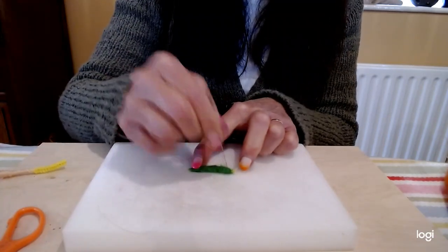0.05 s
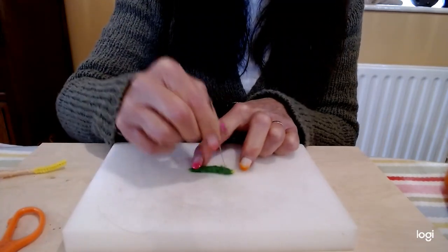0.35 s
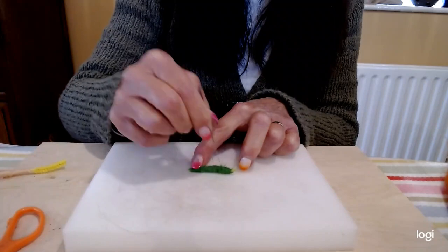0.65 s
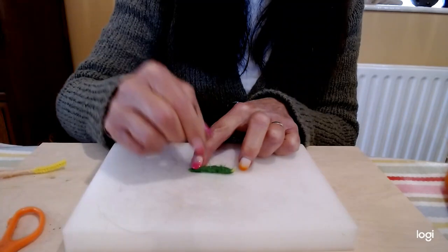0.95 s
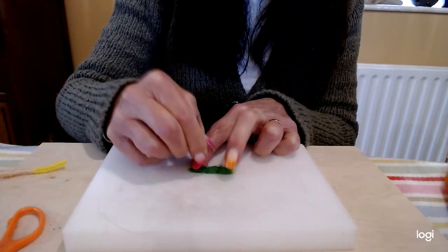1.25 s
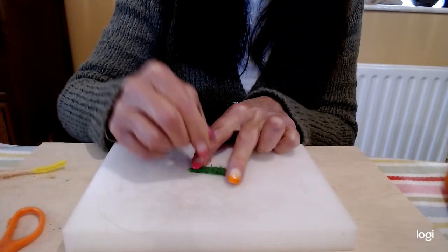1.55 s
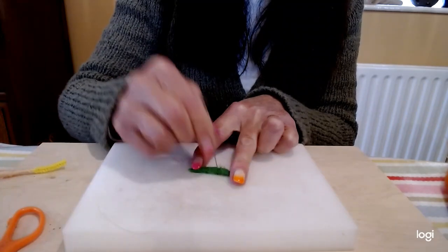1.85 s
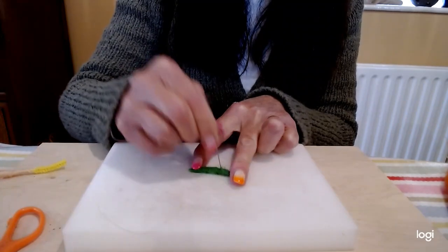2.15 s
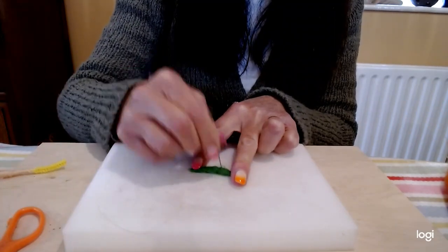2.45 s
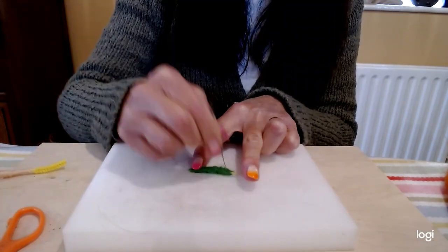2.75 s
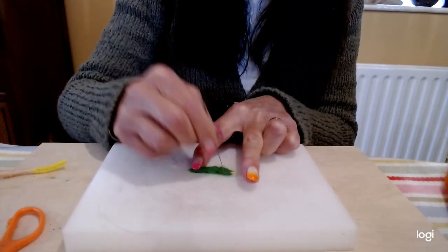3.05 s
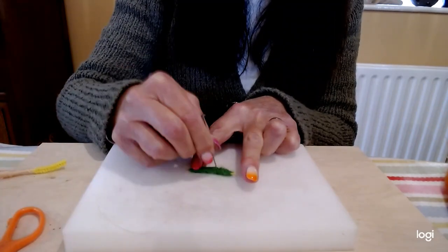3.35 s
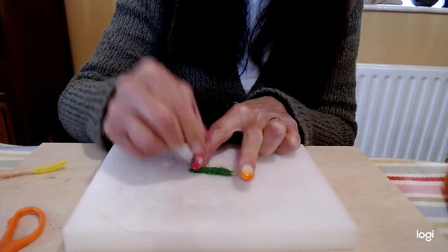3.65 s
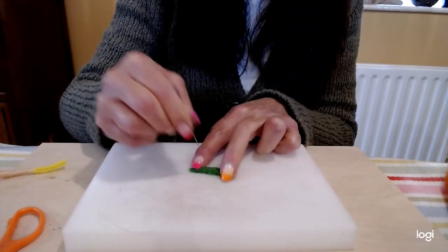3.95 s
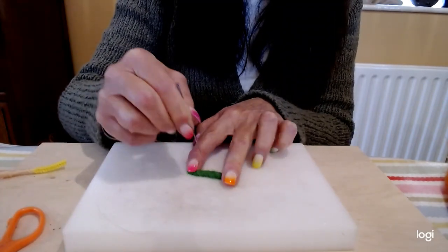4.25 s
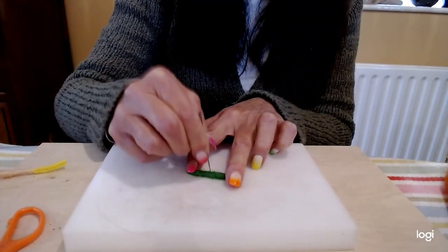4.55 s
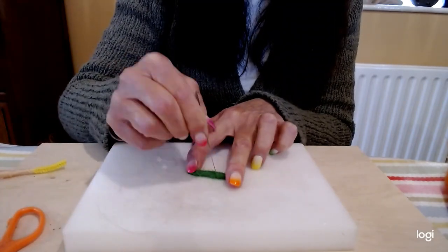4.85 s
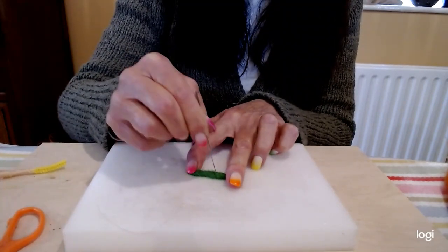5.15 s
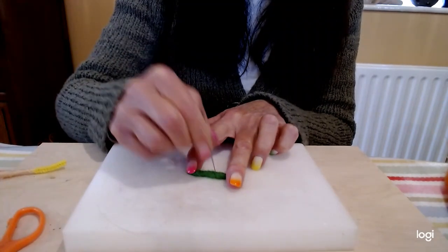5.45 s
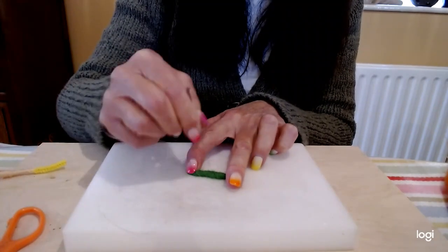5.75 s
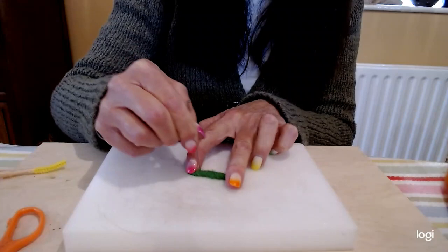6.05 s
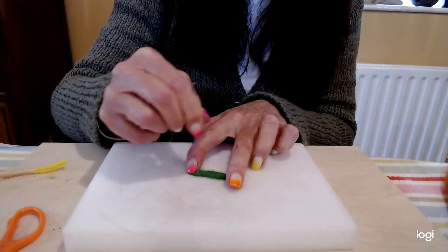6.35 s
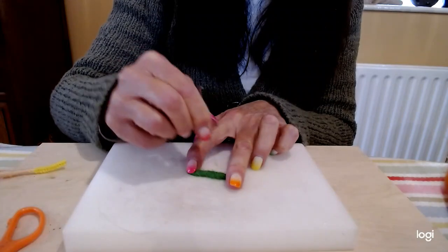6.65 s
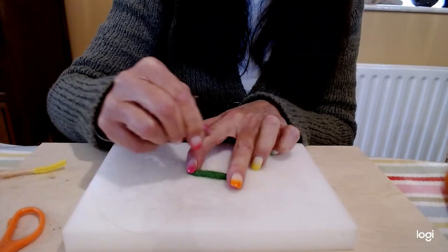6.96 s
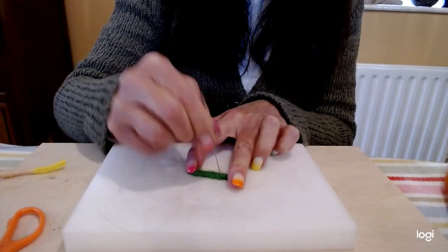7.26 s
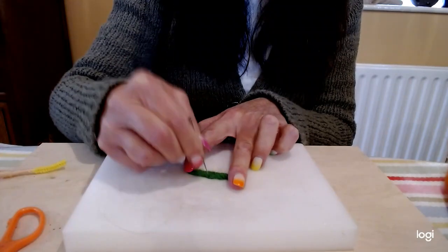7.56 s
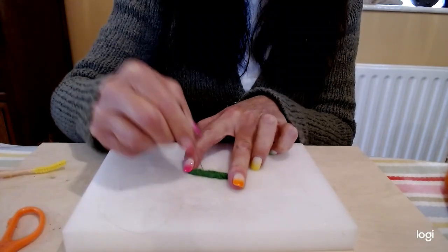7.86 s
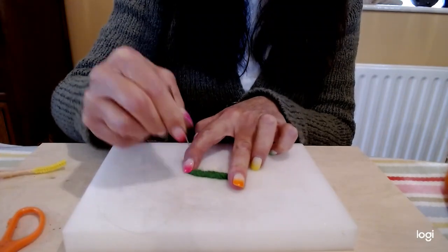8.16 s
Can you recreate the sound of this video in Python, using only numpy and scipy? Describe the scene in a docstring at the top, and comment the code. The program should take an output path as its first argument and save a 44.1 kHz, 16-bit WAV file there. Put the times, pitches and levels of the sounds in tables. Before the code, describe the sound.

Quick, crunchy pokes of a needle into wool on a foam board, turning sparse and soft midway, then picking up again.

```python
"""A barbed felting needle stabs through wool into a foam board on a table; small quiet room, close mic pair.
From 0 s, about five stabs a second: foam cells crunch and snap, the board rings hollow, the table shakes,
the needle scrapes out. Near 2.6 s the stabs pause and fingers rub the wool; at 3.2 s they resume.
After 4.2 s they turn sparse and softer. From 5.6 s the hands bump the table and its sway swells;
the stabs pick up again and regain their level by the end, at 8.2 s."""
import sys
import numpy as np
from scipy import signal
from scipy.fft import rfft, irfft, next_fast_len
from scipy.io import wavfile

SR = 44100
rng = np.random.default_rng(int(sys.argv[2]) if len(sys.argv) > 2 else 0)


def put_to_file(sound):
    """Save the sound as 16-bit audio at rate SR, in the file named by the first command-line argument."""
    columns = np.atleast_2d(sound).T  # one column per channel
    safe = np.clip(columns, -1, 1)
    whole_steps = np.round(safe * 32767)
    wavfile.write(sys.argv[1], SR, whole_steps.astype(np.int16))


N = 361619
TAPS = 2048

# Event levels are before each source's gain; knock and crisp are relative to the ring.
# needle strokes: start/s, end/s, level/dB, knock/dB, crisp/dB, pull-out/dB, table push/dB
STABS = [(0, 0.04, -35, -4.5, -10, -52.5, -58), (0.196, 0.238, -41.5, -6, -10, -61, -58),
         (0.408, .451, -35.5, -4.5, -9.5, -52, -53.5), (0.615, 0.659, -35.5, -5, -9.5, -54.5, -59),
         (0.844, 0.887, -40.5, -2.5, -11, -57.5, -61), (1.058, 1.098, -34.5, -9, -12, -53, -54.5),
         (1.259, 1.306, -31, -4.5, -15, -37, -37.5), (1.476, 1.517, -34.5, -5, -7, -48, -55),
         (1.689, 1.73, -29.5, -5, -12.5, -46, -58), (1.91, 1.94, -37, .5, -17, -53.5, -56.5),
         (2.113, 2.154, -32.5, 1, -17, -59, -54), (2.324, 2.368, -37, -3, -13, -50.5, -63.5),
         (2.53, 2.566, -32.5, 0, -12, -52, -51), (3.235, 3.279, -42.5, -5.5, -7.5, -62.5, -69.5),
         (3.46, 3.496, -35, -8.5, -11, -49.5, -52), (3.675, 3.707, -32, -8, -9.5, -54, -53),
         (3.881, 3.926, -34, -10, -9, -48, -51.5), (4.09, 4.141, -33.5, -5, -13, -51.5, -53),
         (4.629, 4.664, -66.5, -13, 2.5, -86.5, -81), (5.064, 5.128, -45, -13.5, 1, -59.5, -68),
         (5.443, 5.482, -40.5, -7, -14, -54, -59.5), (5.881, 5.909, -40, -7.5, -10, -52, -56),
         (6.062, 6.094, -60.5, -4, -11, -72.5, -56), (6.316, 6.348, -47.5, -8.5, -9, -57.5, -64),
         (6.5, 6.546, -48, -7, -9, -58.5, -61.5), (6.7, 6.747, -52, -6, -7.5, -52.5, -66),
         (6.93, 6.974, -42.5, -9, -12.5, -54, -55.5), (7.138, 7.194, -38, -3.5, -10, -55.5, -55.5),
         (7.572, 7.62, -35, 3, -7, -47, -50), (7.782, 7.829, -37, -5.5, -14, -49, -60),
         (8.002, 8.037, -34, -10, -11, -48, -59.5)]
# board ring as the needle moves along the wool: t/s, f/Hz
RING_TRACK = [(0, 1486), (.43, 1305), (.7, 1446), (1.26, 1293), (1.5, 1334), (1.72, 1305), (2.15, 1445),
              (2.55, 1364), (3.25, 1267), (3.48, 1196), (4.15, 1207), (4.7, 1420), (5.08, 1410),
              (5.45, 1195), (6.95, 1185), (7.7, 1056), (8.1, 1212)]
# modes near the needle, for a ring at RING_REF_HZ: f/Hz, half-width/Hz, level/dB
RING_MODES = [(969, 87, -10), (1098, 100, -3.5), (1280, 140, 0.5), (1489, 26, -7), (1684, 150, -9.5),
              (2249, 230, -17.5)]
RING_REF_HZ = 1303
# board's hollow knock: f/Hz, half-width/Hz, level/dB
KNOCK_MODES = [(180, 25, -26), (414.5, 17, -8.5), (546, 55, -4.5), (651, 71.3, 4.5), (723, 30, -6)]
# deepest board modes, stronger where the ring is high: f/Hz, half-width/Hz, level/dB
DEEP_MODES = [(170.1, 28, -24), (291, 50, -15)]
# spectrum of a bursting cell's edge: f/Hz, level/dB
CRISP_SPECTRUM = [(900, -38), (1900, 0), (2400, 1), (3000, -2.5), (3650, -4), (4600, -11), (5600, -11),
                  (7000, -13), (8200, -24), (9200, -22), (12200, -27.5), (13200, -25.5), (16000, -29.5)]
# table shaken by a stab: f/Hz, density/dB
SHAKE_SPECTRUM = [(10, -14), (25, 1.5), (45, -3), (70, -14), (110, -17), (160, -20), (250, -37.5),
                  (500, -65)]
# table's deeper sway: f/Hz, density/dB
SWAY_SPECTRUM = [(8, 0), (14, 2.5), (30, -10), (60, -17), (110, -27), (200, -44), (500, -73)]
# sway under leaning hands: t/s, level/dB
SWAY_TRACK = [(0, -62), (2.4, -72), (3.1, -78), (5.25, -90.5), (5.6, -55), (5.9, -47), (6.3, -44.5),
              (6.8, -59.5), (7.5, -58.5), (8.2, -72.5)]
# still air: f/Hz, density/dB
AIR_SPECTRUM = [(20, -6.5), (60, -11.5), (120, -15), (220, -18), (400, -21.5), (800, -29), (1600, -31),
                (3000, -37), (6000, -41), (9000, -50), (16000, -49.5)]
# room hum: f/Hz, level/dB
HUM_TONES = [(147, -83.5), (292, -87)]
# hard catches of the needle: t/s, level/dB, knock/dB, crisp/dB
SNAPS = [(.0063, -28, -4, -14), (0.2061, -37, -5.5, -31), (0.4191, -37.5, -7, -16.5),
         (0.4337, -32, -6, -14), (.857, -41.5, 4, -32), (1.0698, -34.5, -21, -36),
         (1.0895, -29.5, -8.5, -5.5), (1.2568, -11, -4.5, -17.5), (1.4978, -29, -16.5, -4),
         (1.7244, -26, -3.5, -32), (1.9142, -34.5, 3.5, -31.5), (1.943, -42.5, -4, -8.5),
         (2.135, -32.5, -8, -10), (2.1587, -34, -3, -7), (2.3419, -29, -6, -13.5), (2.544, -23, -4, -10),
         (3.4803, -27, -7, -14), (3.674, -33, 0, -13), (3.688, -30, -3, -10), (3.8732, -41.5, -23, -9),
         (3.896, -24, -12.5, -30), (3.9094, -32, -17, -9), (4.1335, -34, -11, -5), (4.6577, -58, -13.5, -1),
         (5.0419, -37, -25, 3.5), (5.0519, -35.5, -9, 11), (5.0607, -33.5, -29, 1),
         (5.0729, -34, -22, 25.5), (5.2468, -50, -30, -19), (5.4583, -34.5, -14, -16),
         (5.6452, -40.5, -9, -21.5), (5.8908, -27, -7, -14.5), (5.9035, -37.5, -13, -7),
         (6.0685, -43.5, 3, -16), (6.316, -50.5, -6, -16), (6.5113, -38, -8, -10.5),
         (6.531, -34.3, -8.5, -3.5), (6.609, -53, -23, -0.5), (6.7274, -36, -6.5, -21),
         (7.1336, -29.5, 5, -34), (7.1769, -32.5, -9.5, -5.5), (7.419, -49.5, 11, -29),
         (7.5602, -26, 3.5, -17), (7.574, -23.5, 2, -16.5), (7.82, -35.5, -1, -13),
         (7.8796, -43.5, -4, -15), (8.0164, -33.5, -9, -16.5), (8.0306, -27, -11, -13),
         (8.125, -46.5, -8.5, -10.5)]
# fingers sliding on wool and foam: start/s, end/s, level/dB, crisp/dB
RUBS = [(.784, .843, -55.5, -12.5), (1.645, 1.673, -58, 0), (2.63, 2.709, -62, -6),
        (2.776, 2.85, -58.5, -14), (2.84, 2.961, -60, -2.5), (2.951, 3.131, -71, -6.5),
        (4.517, 4.545, -70.5, -6.5), (5.21, 5.26, -56.5, -6), (5.712, 5.737, -62, -12),
        (7.329, 7.361, -59.5, -16)]
# hand bumps on the table: t/s, level/dB
BUMPS = [(5.642, -40.5), (6.07, -42), (7.338, -45)]
# mic ports, left minus right: f/Hz, level/dB
PORT_BALANCE = [(60, 0.0), (110, 0.5), (200, -4), (380, 2.6), (700, 0.5), (1290, -0.5), (2380, -1.5),
                (4400, -1.5), (8120, 0), (15000, -1)]
# mic ports, left lead: f/Hz, phase/rad
PORT_PHASE = [(100, -2), (600, 0.5), (860, 0), (1450, 0.28), (2070, 0.64), (2760, 1), (3620, 0.38),
              (6500, 0.77), (11000, 0.5), (16000, -1.5)]
# early reflections off table and walls: delay/s, gain
ECHOES = [(.0048, 0.17), (.0105, 0.055), (.0135, .06), (.0245, 0.053), (0.0306, .07), (.0412, 0.041)]
# room decay: f/Hz, T60/s
ROOM_T60 = [(200, 0.52), (650, 0.19), (1500, 0.27), (4000, 0.26), (8000, 0.22), (15000, 0.19)]
# recorder filters' lag, greatest near their crossover: f/Hz, delay/s
GROUP_DELAY = [(0, 0.00084), (4000, 0.00054), (6000, 0.0013), (6800, 0), (7400, .0042), (7900, 0.00022),
               (8600, 0.0022), (10000, 0.00047), (16000, 0.0014)]


def amp(db):
    """dB to gain."""
    return 10 ** (np.asarray(db) / 20)


def unit(x):
    """Scale to rms 1."""
    return x / np.sqrt(np.mean(abs(x) ** 2) + 1e-30)


def lookup(points, hz):
    """Interpolate on a log-frequency axis."""
    f, value = np.transpose(points)
    return np.interp(np.log(hz + 1), np.log(f + 1), value)


def add(mix, start_s, sound):
    """Mix in at start_s."""
    part = mix[max(round(start_s * SR), 0):][:len(sound)]
    part += sound[:len(part)]


def noise(spectrum):
    """Shaped noise, rms 1."""
    gain = amp(lookup(spectrum, np.fft.rfftfreq(N, 1 / SR)))
    return unit(irfft(rfft(rng.standard_normal(N)) * gain, N))


def min_phase(gain):
    """Impulse response, energy 1: sudden onset, then ringing."""
    cepstrum = irfft(np.log(unit(gain) + 1e-5))
    cepstrum[1:TAPS // 2] *= 2
    cepstrum[TAPS // 2 + 1:] = 0
    response = irfft(np.exp(rfft(cepstrum)))
    return response / np.linalg.norm(response)


def modes(rows, uneven_db):
    """Gain of a set of resonances; each spot on the board drives them differently."""
    hz = np.fft.rfftfreq(TAPS, 1 / SR)
    peaks = [amp(db + uneven_db * rng.uniform(-1.31, 1)) / (1 + ((hz - f) / width) ** 2)
             for f, width, db in rows]
    return unit(np.linalg.norm(peaks, axis=0))


def board(at_s, knock_db, deep_db_per_octave=40):
    """Board's response to a bursting cell at the spot worked at at_s: hollow knock plus ring."""
    shift = np.interp(at_s, *np.transpose(RING_TRACK)) / RING_REF_HZ
    deep = [(f, width, db + deep_db_per_octave * np.log2(shift)) for f, width, db in DEEP_MODES]
    retune = rng.uniform(.95, 1.05)  # finger pressure varies per blow
    knock = modes([(f * retune, width, db) for f, width, db in KNOCK_MODES + deep], uneven_db=3)
    ring = modes([(f * shift, width, db) for f, width, db in RING_MODES], uneven_db=2.5)
    return min_phase(np.hypot(amp(knock_db) * knock, ring))


def cell_tear(decay_s=.00073):
    """Crisp edge of a bursting cell: a tiny ragged rip, energy 1."""
    t = np.arange(TAPS) / SR
    rip = rng.standard_normal(TAPS) * t * np.exp(-t / decay_s)
    gain = amp(lookup(CRISP_SPECTRUM, np.fft.rfftfreq(TAPS, 1 / SR)))
    edge = signal.fftconvolve(rip, min_phase(gain))[:TAPS]
    return edge / np.linalg.norm(edge)


def crunch(start_s, end_s, knock_db, crisp_db, *,
           slip_hz, fizz, rise_s, fall_s, arch_db, brighten_db, slip_exponent):
    """Stick-slip over a fizz of fibres. Returns onset/s and sound, rms 1 over the stroke."""
    t = np.arange(max(start_s - .04, 0), end_s + .05, 1 / SR)
    stroke_rng = np.random.default_rng(rng.integers(2 ** 32))
    stick = stroke_rng.gamma(5, 1 / 5, 200)
    slip_at = np.round(np.cumsum(stick) * SR / slip_hz).astype(int)
    inside = slip_at < len(t)
    slips = np.zeros(len(t))
    slips[slip_at[inside]] = stick[inside] ** slip_exponent  # longer stick, harder release
    patch = stroke_rng.integers(0, 5, 100)[((t - t[0]) / .008).astype(int)]  # new cells every 8 ms
    fibres = stroke_rng.laplace(size=len(t))
    depth = np.minimum((t - start_s) / (end_s - start_s), 1)
    friction = amp(-arch_db * (2 * np.maximum(depth, 0) - 1) ** 2)  # peaks mid-stroke
    friction *= np.exp(np.minimum(t - start_s, 0) / rise_s - np.maximum(t - end_s, 0) / fall_s)
    drive = (unit(slips) + fizz * unit(fibres)) * friction
    body = signal.fftconvolve(drive, board(start_s, knock_db))
    edge_drive = drive * amp(brighten_db * depth)  # soft wool on top, crisp foam below
    edge = sum(signal.fftconvolve(edge_drive * (patch == k), cell_tear()) for k in range(5))
    sound = unit(body) + amp(crisp_db) * unit(edge)
    return t[0], sound * np.sqrt((end_s - start_s) * SR) / np.linalg.norm(sound)


def stabs(gain_db=-.78):
    """Barbs tear down through wool and foam."""
    out = np.zeros(N)
    for start_s, end_s, db, knock_db, crisp_db, _, _ in STABS:
        onset_s, sound = crunch(start_s, end_s, knock_db, crisp_db, slip_hz=200, slip_exponent=.67,
                                fizz=.61, rise_s=.0055, fall_s=.0012, arch_db=8, brighten_db=4.5)
        add(out, onset_s, amp(db + gain_db) * sound)
    return out


def rumble(spectrum):
    """Low noise, rms 1, nearly alike at both ports."""
    shared = noise(spectrum)
    return unit(np.array([shared + .3 * noise(spectrum) for _ in range(2)]))


def table_shake(gain_db=-5, rise_s=.02, release_at_s=.09, fall_s=.016):
    """Each stab pushes the table: build, hold, release."""
    t = np.arange(SR // 2) / SR
    envelope = np.minimum(t / rise_s, 1) * np.exp(-np.maximum(t - release_at_s, 0) / fall_s)
    push = np.zeros(N)
    for start_s, *_, push_db in STABS:
        add(push, start_s, amp(push_db + gain_db) * envelope)
    return push * rumble(SHAKE_SPECTRUM)


def table_sway(gain_db=-4):
    """The table sways under leaning hands."""
    level_db = np.interp(np.arange(N) / SR, *np.transpose(SWAY_TRACK))
    return amp(level_db + gain_db) * rumble(SWAY_SPECTRUM)


def room_tone(air_db=-77.5):
    """Still air and a faint hum."""
    t = np.arange(N) / SR
    hum = sum(amp(db) * np.sqrt(2) * np.sin(2 * np.pi * (hz * t + rng.random())) for hz, db in HUM_TONES)
    shared = noise(AIR_SPECTRUM)
    air = unit(np.array([shared + noise(AIR_SPECTRUM) for _ in range(2)]))
    return amp(air_db) * air + hum


def snaps(gain_db=22, ragged=.69, ragged_s=.0011):
    """The needle catches and breaks through: one blow on the board, with brief ragged tearing."""
    out = np.zeros(N)
    t = np.arange(TAPS // 8) / SR
    for at_s, db, knock_db, crisp_db in SNAPS:
        drive = rng.standard_normal(len(t)) * np.exp(-t / ragged_s)
        drive *= ragged / np.linalg.norm(drive)
        drive[0] = 1  # the blow
        body = signal.fftconvolve(drive, board(at_s, knock_db))[:TAPS]
        snap = body / np.linalg.norm(body) + amp(crisp_db) * cell_tear(decay_s=.00061)
        add(out, at_s, -amp(db + gain_db) * snap / np.linalg.norm(snap))
    return out


def scrapes(strokes, gain_db=-3.5, knock_db=-7):
    """Needle or finger slides on wool and foam: softer and finer grained than a stab."""
    out = np.zeros(N)
    for start_s, end_s, db, crisp_db in strokes:
        onset_s, sound = crunch(start_s, end_s, knock_db, crisp_db, slip_hz=480, slip_exponent=1,
                                fizz=1, rise_s=.011, fall_s=.008, arch_db=7, brighten_db=2)
        add(out, onset_s, amp(db + gain_db) * sound)
    return out


def pull_outs(rest_s=.031, pull_s=.041, ref_db=-55, ref_crisp_db=-13, dulling_db_per_db=.39):
    """The needle rests, then scrapes out; a harder pull adds more ring than hiss."""
    strokes = []
    for _, end_s, *_, pull_db, _ in STABS:
        crisp_db = ref_crisp_db - dulling_db_per_db * (pull_db - ref_db)
        strokes.append((end_s + rest_s, end_s + rest_s + pull_s, pull_db, crisp_db))
    return scrapes(strokes)


def table_bumps(mode_hz=32.2, decay_s=.036):
    """A hand bumps the table: one damped low mode."""
    t = np.arange(SR // 2) / SR
    thud = np.sin(2 * np.pi * mode_hz * t) * np.exp(-t / decay_s)
    out = np.zeros(N)
    for at_s, db in BUMPS:
        add(out, at_s, amp(db) * thud)
    return out


def mic_ports(x):
    """Direct sound reaches the two ports with differing phase and level."""
    hz = np.fft.rfftfreq(N, 1 / SR)
    left = amp(lookup(PORT_BALANCE, hz) / 2) * np.exp(1j * lookup(PORT_PHASE, hz) / 2)
    return irfft(rfft(x) * np.array([left, 1 / left]), N)


def room(x, tail_db=-15, coherent_hz=1700, build_s=.014):
    """Early reflections, then a diffuse tail whose bass is alike at both ports."""
    t = np.arange(SR // 2) / SR
    hz, frame_s, bins = signal.stft(rng.standard_normal((2, len(t))), SR, nperseg=256)
    coherence = 1 / (1 + (hz[:, None] / coherent_hz) ** 2)
    bins[1] = coherence * bins[0] + np.sqrt(1 - coherence ** 2) * bins[1]
    decay = amp(-60 * frame_s / lookup(ROOM_T60, hz)[:, None])
    tail = signal.istft(bins * decay, SR, nperseg=256)[1][:, :len(t)]
    tail *= 1 - np.exp(-t / build_s)  # thickens as more walls answer
    tail *= amp(tail_db) / np.linalg.norm(tail[0])
    for k, (delay_s, gain) in enumerate(ECHOES):
        near = k % 2  # alternate sides; far port 5 samples later
        tail[near, round(delay_s * SR)] += gain
        tail[1 - near, round(delay_s * SR) + 5] += gain
    return signal.fftconvolve(x[None], tail, axes=1)[:, :N]


def scene():
    """Needle and fingers, direct and through the room, over table rumble and room tone."""
    work = stabs() + pull_outs() + scrapes(RUBS) + snaps()
    return mic_ports(work) + room(work) + table_shake() + table_sway() + table_bumps() + room_tone()


def record(dry, cutoff_hz=15900):
    """Recorder filters give each click a small chirp, then limit the band."""
    size = next_fast_len(N + TAPS)
    hz = np.fft.rfftfreq(size, 1 / SR)
    delay_s = np.interp(hz, *np.transpose(GROUP_DELAY))
    phase = -2 * np.pi * np.cumsum(delay_s) * SR / size
    chirped = irfft(rfft(dry, size) * np.exp(1j * phase), size)[:, :N]
    lowpass = signal.firwin(511, cutoff_hz, window=("kaiser", 9), fs=SR)
    return signal.oaconvolve(chirped, lowpass[None], "same")


dry = scene()
out = record(dry)
put_to_file(out)
```